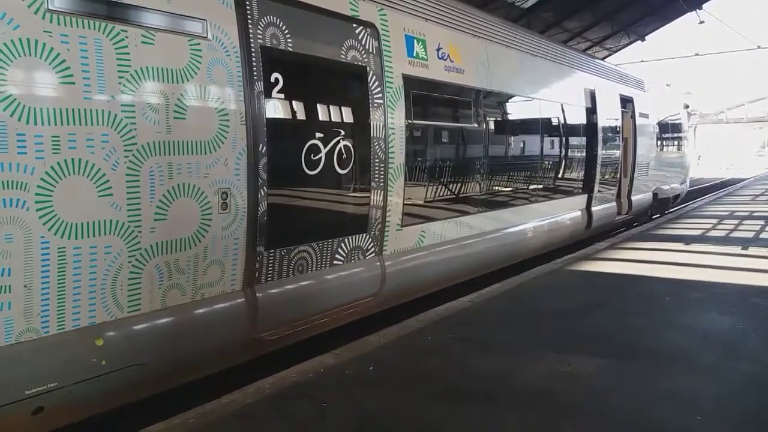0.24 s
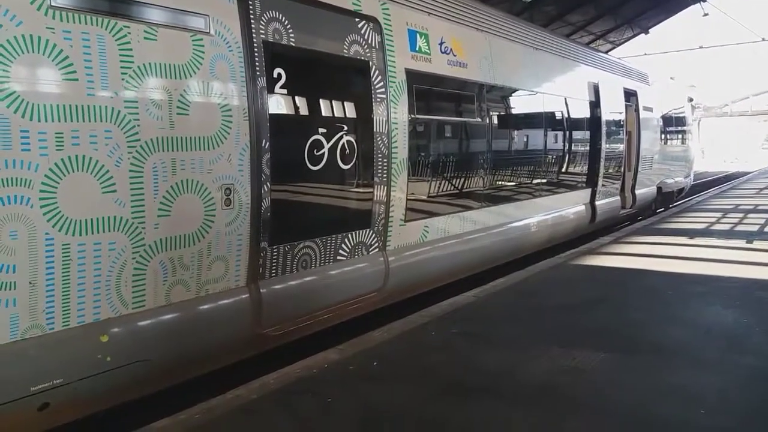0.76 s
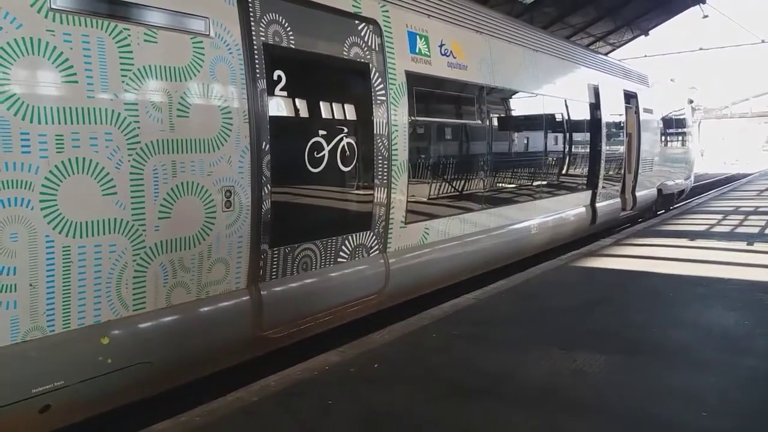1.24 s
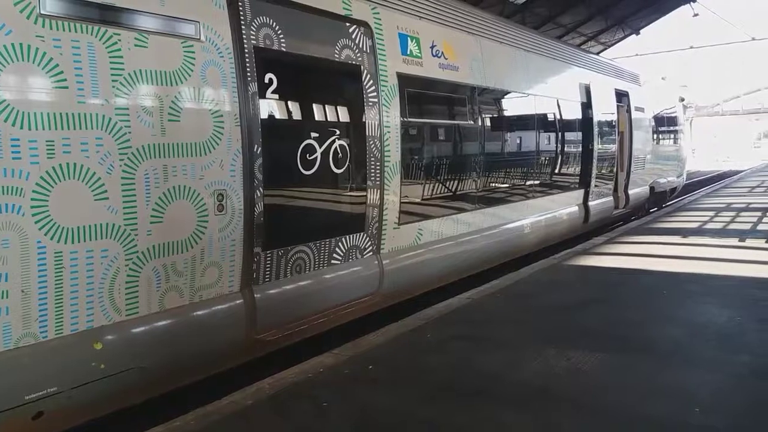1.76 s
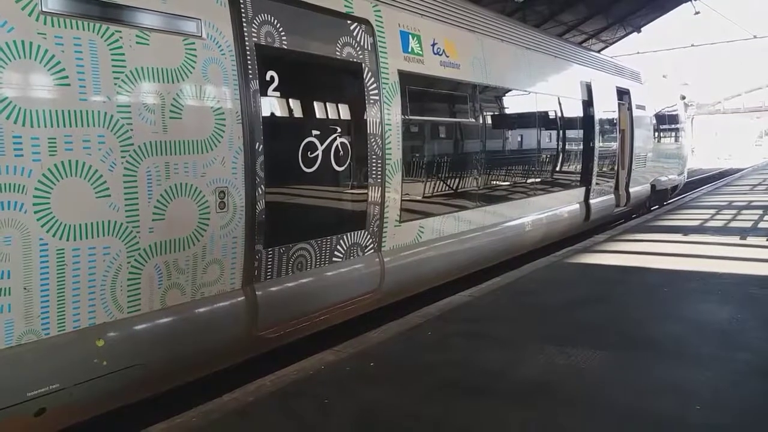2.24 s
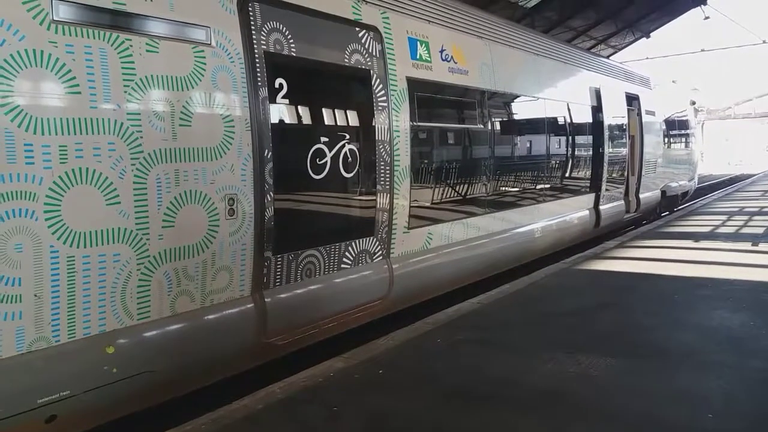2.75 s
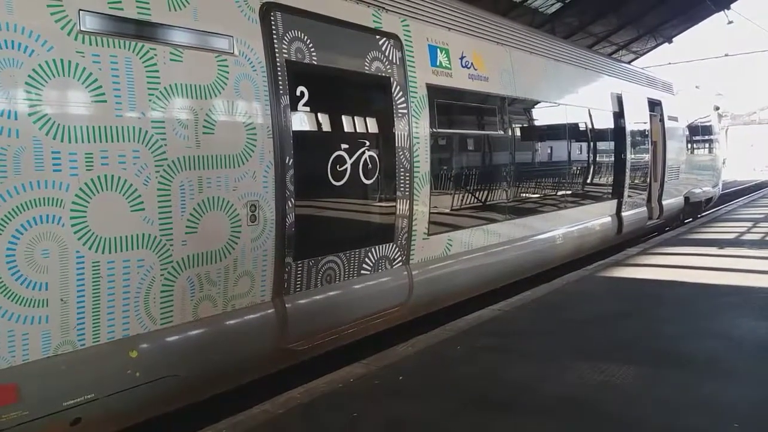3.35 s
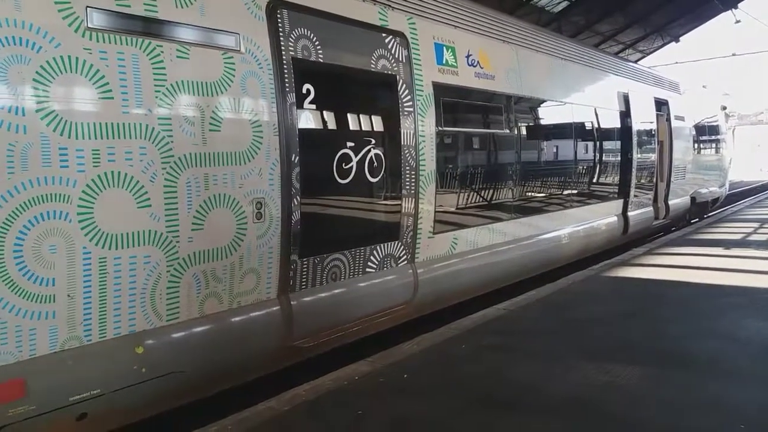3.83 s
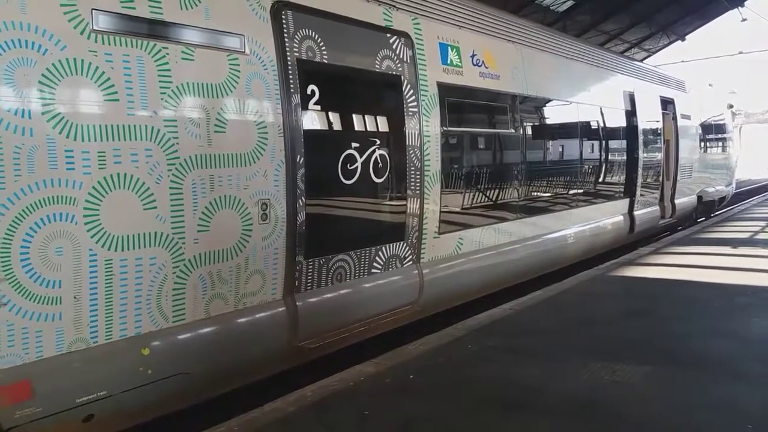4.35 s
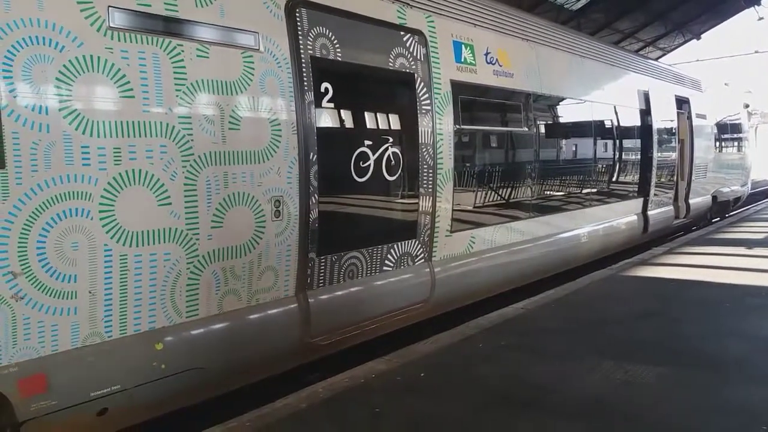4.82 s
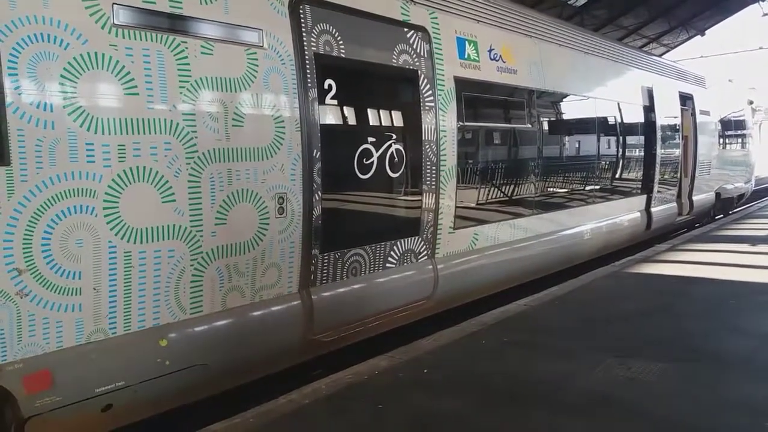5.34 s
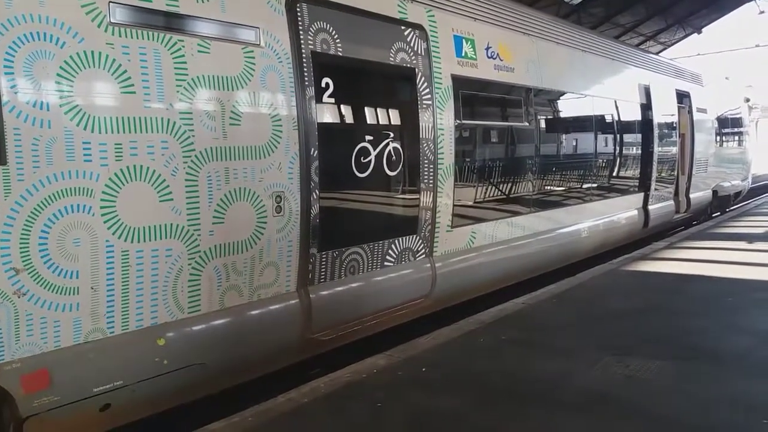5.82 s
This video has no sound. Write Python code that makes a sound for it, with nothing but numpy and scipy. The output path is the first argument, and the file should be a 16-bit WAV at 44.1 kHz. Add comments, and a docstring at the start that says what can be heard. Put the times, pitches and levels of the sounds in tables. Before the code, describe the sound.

On a covered station platform, a railcar diesel idles further along the train with even clatter and a low motor hum. Draughts thump the microphone. Midway, a closer engine clinks, cranks with a grinding whirr, catches in hard coughing blasts and roars, then drops to a loud, steady knocking idle. Strong gusts and two dull pops hit the microphone during the start.

```python
"""A six-cylinder diesel starts near the microphone: it is cranked, catches with a roar, overshoots and settles.
Further along the train, under a station roof, a second one idles at 900 rpm beside a humming motor.
The engines are trains of ringing knocks, gas noise and sines locked to the crankshaft; the motor is sines and hiss.
Draughts along the platform buffet the microphone as low noise, short bursts of swirling pressure and dull pops."""
import sys
import numpy as np
from scipy import signal
from scipy.fft import rfft, irfft, next_fast_len
from scipy.io import wavfile
from scipy.ndimage import uniform_filter1d

SR = 44100
rng = np.random.default_rng(int(sys.argv[2]) if len(sys.argv) > 2 else 0)


def digitize_waveform(pressure):
    """Quantize a signal to 16-bit integers and store it at the path in sys.argv[1].

    Rows of a 2-D input are taken as channels; values are limited to [-1, 1].
    """
    field = np.atleast_2d(pressure).T
    bounded = np.clip(field, -1, 1)
    quanta = np.round(bounded * 32767).astype(np.int16)
    wavfile.write(sys.argv[1], SR, quanta)


N = 267728
TIME = np.arange(N) / SR

# "cycle" is one four-stroke cycle, two turns of the crankshaft; an "order" is a multiple of its rate

# near engine, cranked, overshooting and settling: time_s, speed_cycles_per_s
START_SPEED = [(3.45, 2), (3.6, 4), (4.02, 8.35), (4.22, 7.75), (4.45, 7.25), (4.75, 7.03), (5.2, 7.19),
               (5.4, 7.24), (6.07, 7.335)]
# its block and underframe: pitch_hz, relative_db (per Hz)
START_BODY = [(40, -18), (110, 1), (160, -3.5), (350, -1.5), (500, -1.5), (700, -2.5), (1130, 0.5),
              (1530, -13), (2050, -13.5), (2450, -22.5), (3700, -31.5), (5050, -31.5), (6000, -40),
              (9000, -44), (15500, -49.5)]
# its crankshaft lines: order, relative_db
START_ORDERS = [(6, -47), (9, -47), (12, -52), (18, -44), (33, -48.5), (36, -44), (48, -43), (56, -43),
                (81, -46), (105, -45), (109, -43), (111, -43), (126, -44), (135, -44), (144, -43),
                (149, -45)]
# roar of richly fuelled firings: pitch_hz, relative_db (per Hz)
ROAR_BODY = [(100, -8), (290, -0.5), (400, -2.5), (560, 1), (760, -1), (1170, -7), (1600, -8), (1950, -27),
             (2600, -21.5), (3900, -39.5), (7000, -40), (15500, -48)]
# surges of fuel: start_s, hold_s, release_s, roar_db, clatter_lift_db
SURGES = [(4.02, 0.13, 0.081, -27.5, -3), (4.453, 0.068, 0.066, -36, 1.5), (4.64, 0.023, 0.051, -31.5, 2.5),
          (4.81, .07, .05, -39, 0.7)]
# orders that boom for a while: start_s, hold_s, order, level_db
BOOMS = [(4.02, .16, 36, -36.5), (4.85, .26, 36, -32), (4.98, .24, 56, -37), (5.0, .28, 48, -41.5),
         (5.42, .65, 144, -39.5), (5.72, .35, 36, -37), (5.72, .35, 106, -39.5), (5.75, .32, 134, -42)]
# gear lines of the starter and the timing train: order, relative_db
STARTER_ORDERS = [(42, -3), (48, -2), (60, -2), (72, -1), (84, -2), (90, -2), (102, -3), (114, -5),
                  (132, -6)]
# first firings, each a blast with a rasping edge: centre_s, length_s, roar_db, rasp_db
FIRST_FIRINGS = [(3.91, .015, -37, -49), (3.966, 0.013, -36, -42.5), (4.003, .014, -27, -35.5),
                 (4.04, .016, -27, -42), (4.082, 0.018, -26, -41), (4.156, 0.015, -29, -38),
                 (4.26, .02, -31, -45)]
# rasp of those firings: pitch_hz, relative_db (per Hz)
RASP_BODY = [(500, -20), (1200, 7), (2000, 3), (2800, 3), (4500, -10.5), (7000, -16), (15500, -20)]
# rough whines as the gears take up and shed the load: centre_s, length_s, pitch_hz, glide_hz_per_s, relative_db
WHINES = [(3.79, .07, 368, 330, -33.5), (3.86, .05, 790, 900, -38), (3.975, .035, 600, -2200, -35),
          (4.007, 0.026, 1174, -300, -27.5), (4.068, 0.035, 752, 300, -28.5), (4.115, .03, 805, 0, -31),
          (4.14, .04, 1040, 600, -30)]
# block and underframe of the idling engine: pitch_hz, relative_db (per Hz)
IDLE_BODY = [(30, -27), (60, -3), (170, 0), (215, -6.5), (270, 1), (350, -4), (560, -3.5), (790, -3),
             (1150, -4), (1370, -6), (1600, -13), (2020, -10.5), (2400, -24), (3300, -36), (4300, -35.5),
             (7500, -42), (15500, -47)]
# its orders that meet a resonance of exhaust or panels: order, level_db
IDLE_ORDERS = [(9, -46.5), (12, -45.5), (24, -44.5), (33, -51), (35, -53), (49, -50.5), (60, -54),
               (75, -49.5), (80, -53), (84, -51), (90, -50), (93, -54), (103, -51), (108, -47.5),
               (111, -46.5), (124, -51), (126, -51.5), (130, -48), (139, -51.5)]
# panels and covers that one cylinder sets ringing: order, peak_db, place_in_cycle (0-1), ring_s
IDLE_PANELS = [(56, -39, .77, .022), (102, -36.3, .86, .02), (135, -42.5, .5, .012),
               (153, -42.5, .37, .018), (260, -48, .1, .014), (263, -51, .58, .012)]
# hum of the auxiliary motor: pitch_hz, level_db
MOTOR = [(147, -51.5), (165.55, -37), (184, -48.5), (294, -48.5), (313, -55)]
# cooling air under the car: pitch_hz, relative_db (per Hz)
AIR = [(200, -9), (1300, 10.5), (2300, 7.5), (3300, -4.5), (4200, -0.5), (5100, -7), (6000, -7),
       (8000, -26), (15500, -27)]
# turbulence at the microphone: pitch_hz, relative_db (per Hz)
WIND_BODY = [(20, -20), (38, -23), (60, 3), (110, 3.5), (200, -6.5), (330, -9.5), (600, -27), (1500, -54),
             (15000, -90)]
# gusts on top of the steady draught: start_s, hold_s, level_db
GUSTS = [(0.284, 0.089, -38), (.6, 0.14, -36.5), (.96, 0.37, -36), (2.242, 0.047, -34), (4.177, 0.092, -28),
         (4.446, 0.49, -30.5), (5.2, 0.47, -44)]
# single eddies that strike the microphone: centre_s, swing_db, pitch_hz, length_s
EDDIES = [(0.608, -27, 90, 0.011), (.755, -23.5, 163, .014), (.958, -21, 165, 0.012),
          (.967, -24, 270, .006), (.976, -19.5, 95, 0.011), (1.024, -22.5, 225, 0.0042),
          (1.08, -27, 110, .015), (1.125, -27, 130, .012), (1.16, -26.5, 150, 0.014),
          (1.226, -21, 95, 0.009), (1.266, -16, 125, 0.0052), (1.286, -18.5, 85, 0.0083),
          (2.947, -19.5, 105, 0.0057), (3.197, -29, 240, .004), (3.207, -16, 92, 0.007),
          (4.499, -16, 210, 0.005), (4.52, -18.5, 140, .008), (4.637, -19, 270, 0.008),
          (4.703, -18, 250, 0.004), (4.808, -25, 390, .012), (4.85, -20, 192, 0.012),
          (4.887, -16, 58, 0.0079), (4.911, -17.5, 109, 0.012), (5.43, -21.5, 164, .009),
          (5.53, -19, 190, 0.0067)]
# dull pops of wind right at the port: start_s, suction_db
POPS = [(4.628, -3), (4.6975, -5)]
# microphone port, bass roll-off and rippled treble: pitch_hz, gain_db
PORT = [(20, -12), (32, -21), (45, -1.5), (60, 0.5), (4500, -0.5), (5100, 1), (5500, -7), (5850, -2),
        (6250, -8), (6800, -1.5), (7800, -9), (8750, 1.5), (9400, -4), (10600, -2), (11650, -7),
        (12700, -0.5), (13600, -8), (14500, -1), (15500, -8)]

# near engine: cranking begins, pinion clinks, cylinders catch (s)
CRANK_S, CLINK_S, CATCH_S = 3.56, 3.585, 4.07
# clatter while cranked and while running (dB), time constant of each build-up (s)
CRANK_DB, RUN_DB, BUILD_S = -35.5, -27.5, 0.12
SURGE_ATTACK_S, BOOM_FADE_S = 0.045, 0.04
# the fuel is cut after the overshoot and the knock goes dull: s, s, s, treble change in dB
FUEL_CUT_S, FUEL_CUT_HOLD_S, FUEL_CUT_FADE_S, FUEL_CUT_DB = 4.21, .16, .025, -2.5
# starter gears: full strength from (s), for (s), rise and run-down (s), gain on the lines (dB)
STARTER_S, STARTER_HOLD_S, STARTER_FADE_S, STARTER_DB = 3.74, 0.21, 0.18, -45
# idling engine: cycles per s, clatter gain (dB), gas noise against the knock (dB)
IDLE_CYCLE_HZ, IDLE_DB, IDLE_GAS_DB = 7.504, -33.5, -5.5
# once-a-cycle swell of the knock around 1 kHz (dB), where it peaks (0-1 of a cycle)
CHUG_DB, CHUG_PLACE = .8, .5
# share of a panel's ring that lasts from one blow to the next
PANEL_SUSTAIN = .35
# steady draught and its slow wander (dB)
DRAUGHT_DB, DRAUGHT_WANDER_DB = -44, 3
GUST_ATTACK_S, GUST_RELEASE_S = 0.043, 0.031
# time to the peak of a pop's pull and of its rebound
POP_S, REBOUND_S = .0005, .0017
# top of the recorded band
TOP_HZ = 15600


def starting_engine(drone_db=-2.0):
    """The near engine is spun up, catches and settles; each surge of fuel adds roar and alters its clatter."""
    turns = np.cumsum(curve(START_SPEED)) / SR
    cranking = undb(CRANK_DB - RUN_DB) * envelope(CRANK_S, np.inf, BUILD_S, 1)
    running = envelope(CATCH_S, np.inf, BUILD_S, 1)
    effort = np.maximum(cranking, running)
    roar_gain = 0
    for start_s, hold_s, release_s, roar_db, lift_db in SURGES:
        fuel = envelope(start_s, hold_s, SURGE_ATTACK_S, release_s)
        roar_gain = roar_gain + undb(roar_db) * fuel
        effort = effort * undb(lift_db * fuel)
    hum = undb(drone_db) * drone(turns, START_ORDERS, waver_db=2.5)
    clatter = diesel(turns, START_BODY, ring_s=0.011, gas_db=-1.5, tick_db=-23.0, rattle_db=-31.0)
    clatter = undb(RUN_DB) * clatter
    treble = colour(clatter, [(900, -40), (1600, -8), (2400, 0), (15500, 0)])
    fuel_cut = envelope(FUEL_CUT_S, FUEL_CUT_HOLD_S, FUEL_CUT_FADE_S, FUEL_CUT_FADE_S)
    clatter = clatter + treble * (undb(FUEL_CUT_DB * fuel_cut) - 1)
    rich_firings = knocks(turns, ring_s=0.0065, scatter_db=4.0, uneven_db=-0.5, hall=0.19, count=6)
    roar = unit(colour(rich_firings, ROAR_BODY)) * roar_gain
    return (clatter + hum) * effort + roar + booms(turns) + starter_whine(turns)


def first_firings():
    """The cylinders catch one by one, each a separate hard blast of coloured noise."""
    roar = unit(colour(rng.standard_normal(N), ROAR_BODY))
    rasp = unit(colour(rng.standard_normal(N), RASP_BODY))
    out = 0
    for centre_s, length_s, roar_db, rasp_db in FIRST_FIRINGS:
        blast = np.exp(-((TIME - centre_s) / length_s) ** 2)
        out = out + (undb(roar_db) * roar + undb(rasp_db) * rasp) * blast
    return out


def booms(turns):
    """Single orders of the near engine swell for a while, roughened by small random shifts of phase."""
    shaky = turns + .0013 * walk(30)
    out = 0
    for start_s, hold_s, order, db in BOOMS:
        line = drone(shaky, [(order, db)], waver_db=1.7, waver_hz=22)
        out = out + line * envelope(start_s, hold_s, BOOM_FADE_S, BOOM_FADE_S)
    return out


def starter_whine(turns, chatter_db=3):
    """Starter gears grind with the crankshaft; irregular lurches bend the lines and break them up."""
    lurch = np.cumsum(np.gradient(turns) * .022 * walk(22))
    gears = drone(turns + lurch, STARTER_ORDERS, waver_db=4, waver_hz=14)
    swell = envelope(STARTER_S, STARTER_HOLD_S, STARTER_FADE_S, STARTER_FADE_S)
    return gears * swell * undb(STARTER_DB + chatter_db * walk(50))


def whines(chatter_db=-1.0):
    """Short gliding whines, made rough by chattering teeth: random level and phase."""
    out = 0
    for centre_s, length_s, hz, glide, db in WHINES:
        age = TIME - centre_s
        phase = hz * age + glide * age ** 2 / 2 + .08 * walk(90)
        gain = undb(db + chatter_db * walk(80)) * np.exp(-(age / length_s) ** 2)
        out = out + gain * np.sin(2 * np.pi * phase)
    return out


def starter_clink(ring_s=0.012, db=-40.5):
    """The starter pinion meets the flywheel: metallic noise that starts at once and decays."""
    age = np.maximum(TIME - CLINK_S, 0)
    metal = unit(colour(rng.standard_normal(N), [
        (100, -40), (1500, -25), (2300, -9), (2650, 6), (3100, -2), (3600, -16), (9000, -24), (15000, -30)]))
    return undb(db) * metal * (age > 0) * np.exp(-age / ring_s)


def idling_engine(throb_db=0.36, lope_db=-0.1):
    """The engine further along the train turns steadily; it throbs with each turn and lopes once a cycle."""
    turns = IDLE_CYCLE_HZ * TIME
    clatter = diesel(turns, IDLE_BODY, ring_s=.012, gas_db=IDLE_GAS_DB, tick_db=-24.0, rattle_db=-22.0)
    beat_db = throb_db * np.cos(4 * np.pi * turns) + lope_db * np.cos(2 * np.pi * turns)
    hum = drone(turns, IDLE_ORDERS, waver_db=1.2)
    engine = (clatter * undb(IDLE_DB) + hum) * undb(beat_db)
    knock = colour(engine, [(820, -40), (920, 0), (1300, 0), (1450, -40)])
    chug = undb(CHUG_DB * np.cos(2 * np.pi * (turns - CHUG_PLACE))) - 1
    return engine + knock * chug + panel_rings(turns)


def panel_rings(turns, scatter_db=1.4):
    """Each panel rings at one order, struck at its own place in the cycle; it swells but never quite dies."""
    out = 0
    for order, db, place, ring_s in IDLE_PANELS:
        age = (turns - place) % 1 / IDLE_CYCLE_HZ  # s since the last blow
        pulse = (age / ring_s * np.exp(1 - age / ring_s)) ** 2
        swell = PANEL_SUSTAIN + (1 - PANEL_SUSTAIN) * pulse
        out = out + undb(db + scatter_db * walk(6.2)) * swell * np.sin(2 * np.pi * order * turns)
    return out


def diesel(turns, body, ring_s, gas_db, tick_db, rattle_db):
    """Six cylinders knock, gas rushes, valves and injectors tick, and a cover rattles once a cycle."""
    firing = knocks(turns, ring_s, scatter_db=1, uneven_db=1.0, hall=0.11, count=6)
    gas = rng.standard_normal(N) * undb(2.0 * walk(12))
    block = unit(colour(firing + undb(gas_db) * gas, body))
    ticks = knocks(turns, ring_s=0.0013, scatter_db=6.0, uneven_db=-0.5, hall=0.056, count=18)
    ticks = unit(colour(ticks, [
        (300, -26), (1000, 14.5), (2000, 3.0), (2800, 7.5), (4500, -8.0), (6500, -2.5), (8000, -7.5),
        (15000, -6.0)]))
    rattle = knocks(turns, ring_s=0.029, scatter_db=0.5, uneven_db=0, hall=0.12, count=1)
    rattle = unit(colour(rattle, [
        (1200, -48), (1750, -15), (2000, 4), (2200, -13.0), (2700, -21.0), (6000, -68)]))
    mix = block + undb(tick_db) * ticks + undb(rattle_db) * rattle
    return mix * undb(0.48 * walk(6.3))


def knocks(turns, ring_s, scatter_db, uneven_db, hall, count):
    """Evenly spaced blows in each cycle; each place in it keeps its own dense ring and roof echo."""
    out = np.zeros(N)
    for place in range(count):
        at = np.flatnonzero(np.diff(np.floor(turns - place / count)))
        blows = np.zeros(N)
        blows[at] = undb(scatter_db * rng.uniform(-1, 1, len(at)))
        # the sound builds up as it finds its way out from under the car
        age = TIME / ring_s
        decay = age * np.exp(1 - age) + hall * np.exp(-TIME / 0.31)
        ring = rng.standard_normal(N) * decay
        gain = undb(uneven_db * np.cos(4 * np.pi * place / count))
        out += gain * irfft(rfft(blows) * rfft(ring), N)
    return unit(out)


def drone(turns, orders, waver_db, waver_hz=4.02):
    """Sine lines locked to the crankshaft; each wavers on its own."""
    out = 0
    for order, db in orders:
        gain = undb(db + waver_db * walk(waver_hz))
        out = out + gain * np.sin(2 * np.pi * (order * turns + rng.random()))
    return np.sqrt(2) * out  # makes the line levels rms


def motor(air_db=-51):
    """An auxiliary fan motor hums in wavering sines and pushes a smooth hiss of air."""
    hum = 0
    for hz, db in MOTOR:
        gain = np.sqrt(2) * undb(db + .5 * walk(3.08))
        hum = hum + gain * np.sin(2 * np.pi * (hz * TIME + rng.random()))
    hiss = unit(colour(rng.standard_normal(N), AIR))
    return hum + hiss * undb(air_db + 1.2 * walk(4.2))


def wind(lumpy_db=3, bright_db=-2.0):
    """Lumpy low turbulence swells with each gust and reaches higher in strong ones."""
    power = undb(DRAUGHT_DB + DRAUGHT_WANDER_DB * walk(2.75)) ** 2
    for start_s, hold_s, db in GUSTS:
        gust = undb(db) * envelope(start_s, hold_s, GUST_ATTACK_S, GUST_RELEASE_S)
        power = power + gust ** 2
    force = np.sqrt(power)
    lumps = undb(lumpy_db * np.tanh(walk(60)))
    rumble = unit(colour(rng.standard_normal(N) * lumps, WIND_BODY))
    flutter = unit(colour(rng.standard_normal(N) * lumps, [
        (70, -8.5), (190, -4.5), (450, -12.0), (1500, -40), (15000, -80)]))
    return (rumble + undb(bright_db) * flutter * force / force.max()) * force


def eddies(churn_share=0.23, churn_hz=190):
    """A passing eddy sucks and pushes at the diaphragm in uneven swings; a fast one churns more as it breaks."""
    swirl = np.cumsum(undb(2 * walk(200))) / SR  # time that runs unevenly
    churn = unit(colour(rng.standard_normal(N), [
        (100, -12), (260, 0), (450, -3), (800, -14), (2000, -40), (15000, -80)]))
    out = 0
    for centre_s, db, hz, length_s in EDDIES:
        swing = np.sin(2 * np.pi * hz * (swirl - np.interp(centre_s, TIME, swirl)))
        passing = undb(db) * np.exp(-((TIME - centre_s) / length_s) ** 2)
        out = out + passing * (swing + churn_share * (hz / churn_hz) ** 2 * churn)
    return out


def pops():
    """A sudden suction pulls the diaphragm, which swings back more slowly as the pressure evens out."""
    out = 0
    for start_s, db in POPS:
        age = np.maximum(TIME - start_s, 0)
        pull = age / POP_S * np.exp(1 - age / POP_S)
        rebound = age / REBOUND_S * np.exp(1 - age / REBOUND_S)
        out = out + undb(db) * (rebound * POP_S / REBOUND_S - pull)  # equal areas cancel
    return colour(out, [(500, 0), (1000, -5), (2000, -22), (6000, -60)])


def envelope(start_s, hold_s, attack_s, release_s):
    """Gain that swells to 1 at the start, holds and dies away."""
    early = np.maximum(start_s - TIME, 0)
    late = np.maximum(TIME - start_s - hold_s, 0)
    return np.exp(-early / attack_s - late / release_s)


def walk(rate):
    """Random levels held 1 / rate s and smoothed twice, scaled to rms 1."""
    hold = int(SR / rate)
    steps = np.repeat(rng.standard_normal(N // hold + 1), hold)
    return unit(uniform_filter1d(uniform_filter1d(steps, hold), hold)[:N])


def colour(x, points):
    """Filter by a spectrum of (pitch_hz, gain_db) points, joined on a logarithmic pitch scale."""
    hz, db = np.transpose(points)
    size = next_fast_len(N + SR // 4)
    bins_hz = np.maximum(np.fft.rfftfreq(size, 1 / SR), 1)
    gain = undb(np.interp(np.log(bins_hz), np.log(hz), db))
    return irfft(rfft(x, size) * gain, size)[:N]


def curve(rows):
    """Rows (time_s, value) joined by straight lines."""
    return np.interp(TIME, *np.transpose(rows))


def unit(x):
    """Scale to rms 1."""
    return x / np.sqrt(np.mean(x ** 2))


def undb(db):
    """Decibels to gain."""
    return 10 ** (np.asarray(db) / 20)


def scene():
    """Near engine, distant engine, motor and draught at one microphone."""
    near = starting_engine() + first_firings() + whines() + starter_clink()
    distant = idling_engine() + motor()
    draught = wind() + eddies() + pops()
    return (near + distant + draught)[None]


def record(dry):
    """The microphone port thins the bass and ripples the treble; the recorder cuts the top."""
    heard = np.array([colour(channel, PORT) for channel in dry])
    top_cut = signal.ellip(12, .2, 80, TOP_HZ, fs=SR, output="sos")
    return signal.sosfilt(top_cut, heard)


dry = scene()
out = record(dry)
digitize_waveform(out)
```